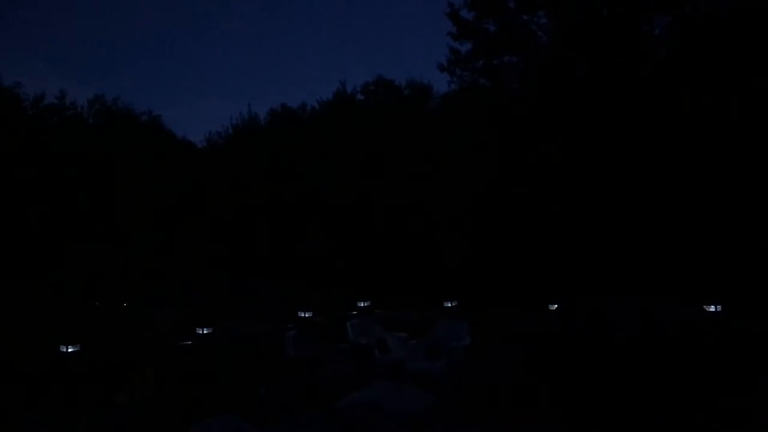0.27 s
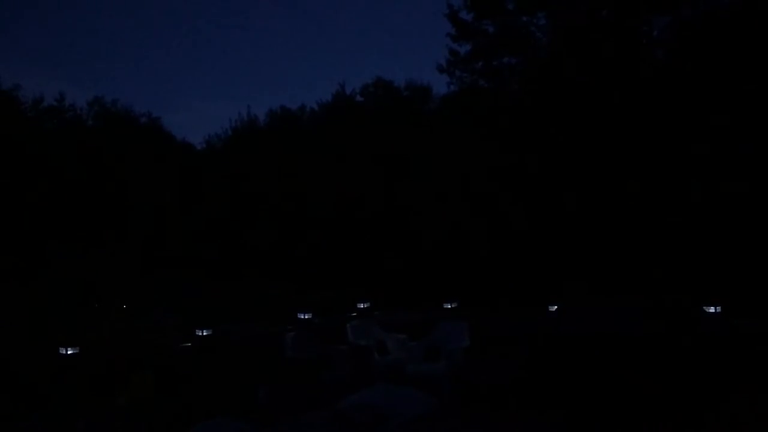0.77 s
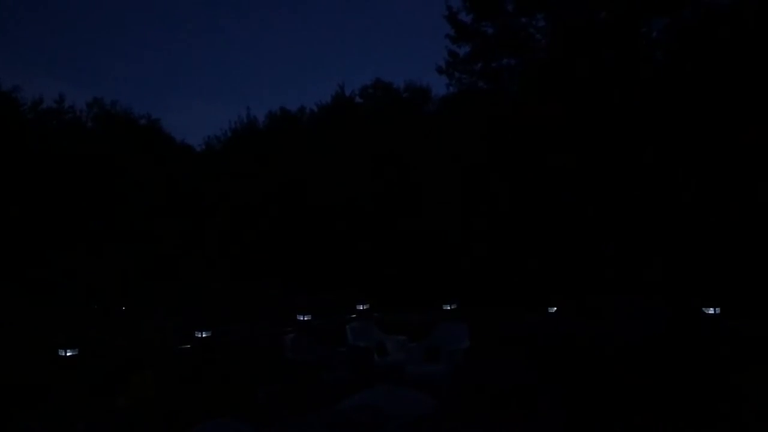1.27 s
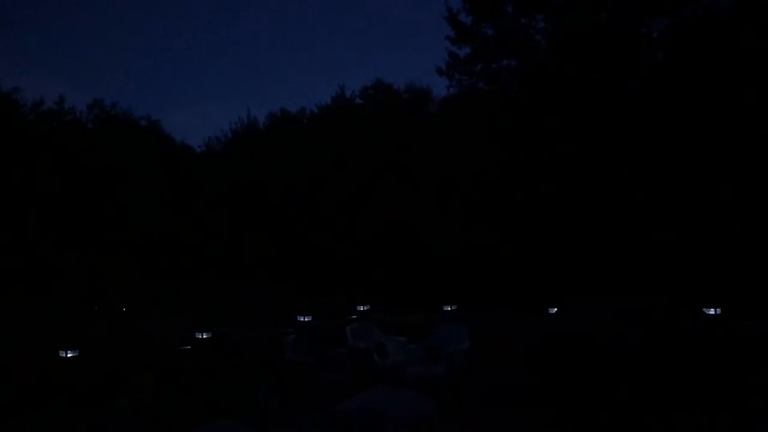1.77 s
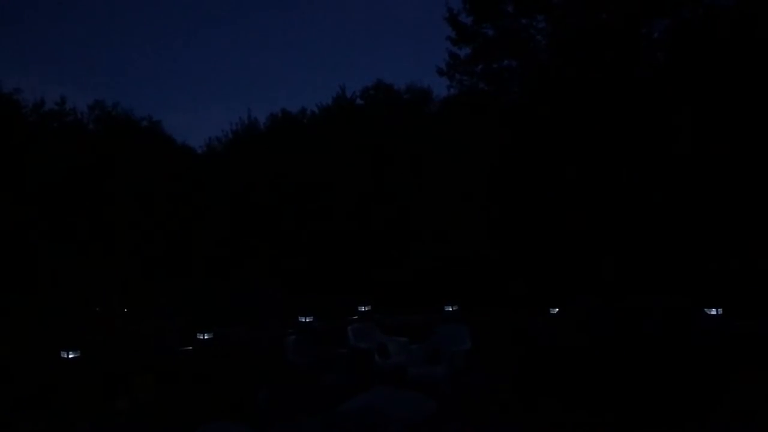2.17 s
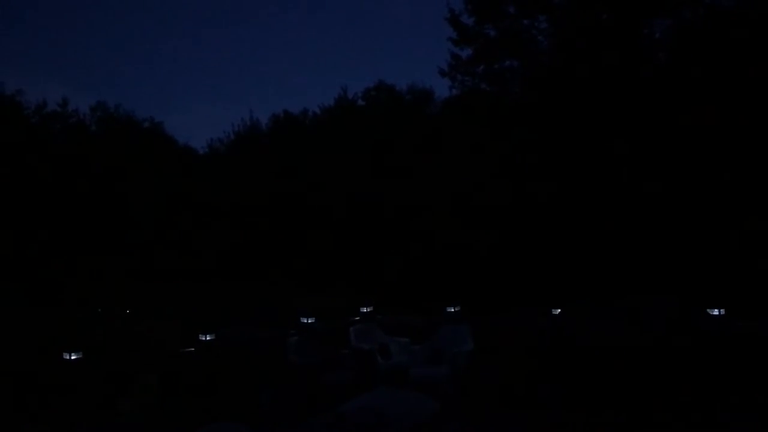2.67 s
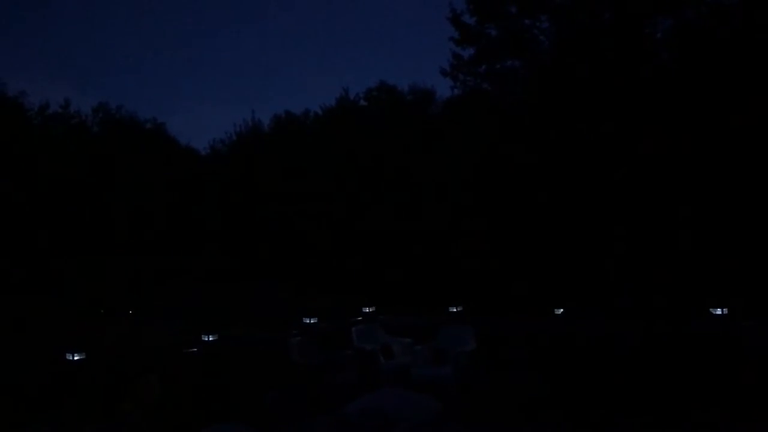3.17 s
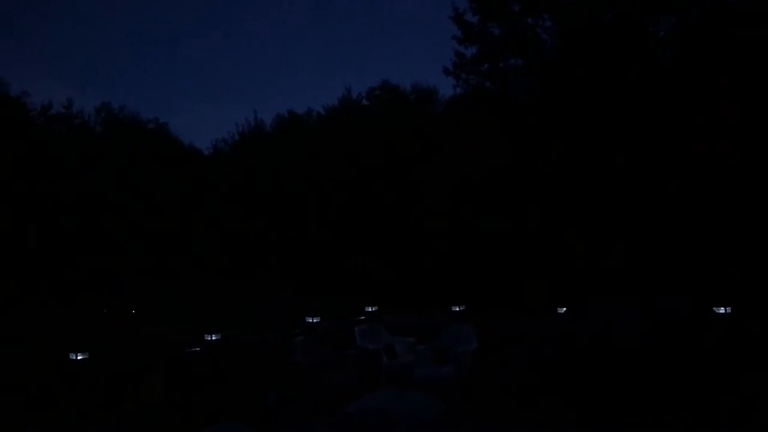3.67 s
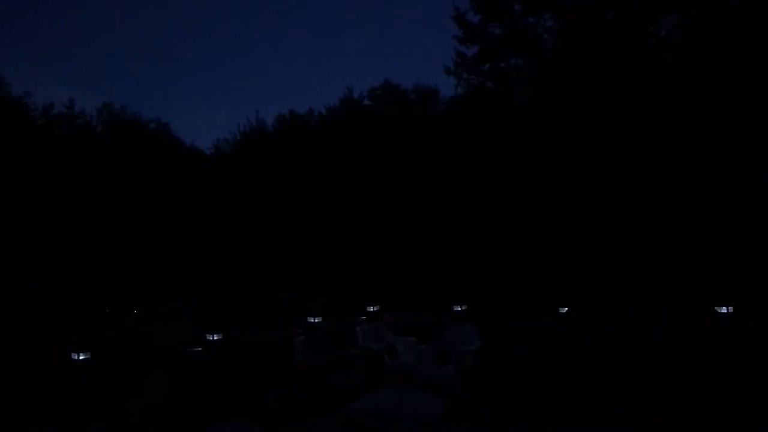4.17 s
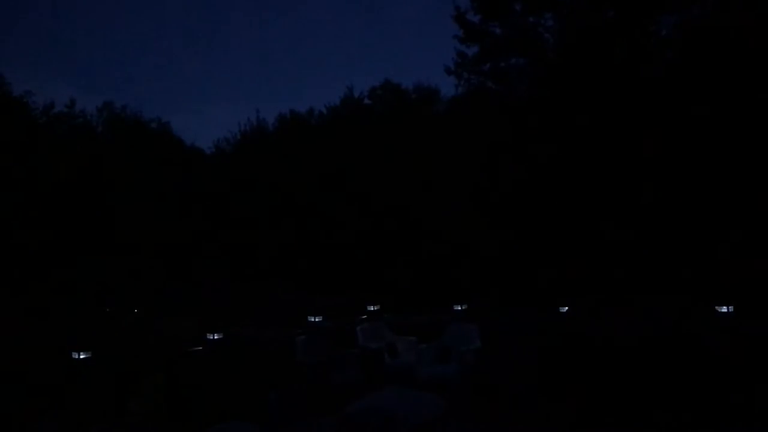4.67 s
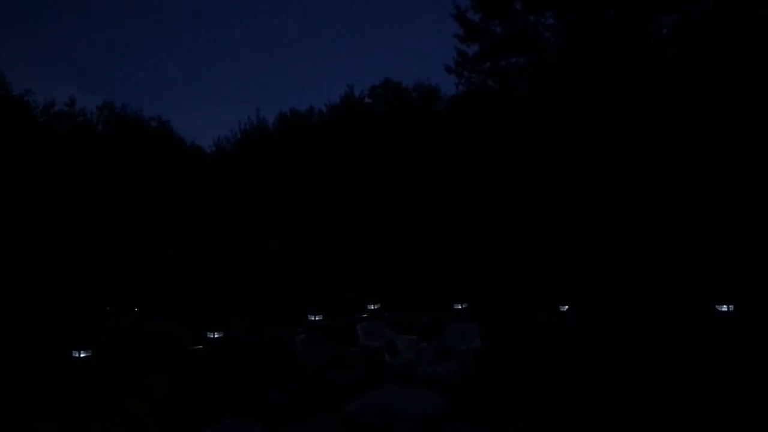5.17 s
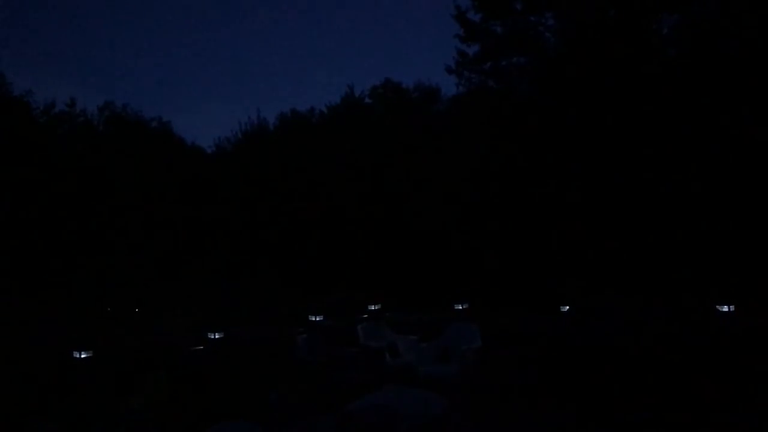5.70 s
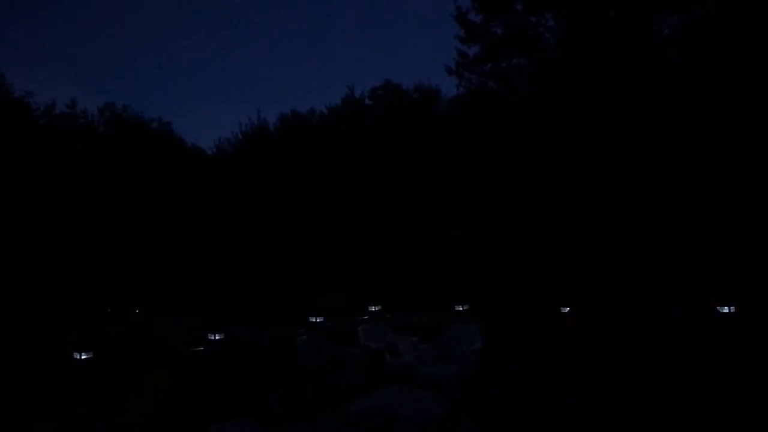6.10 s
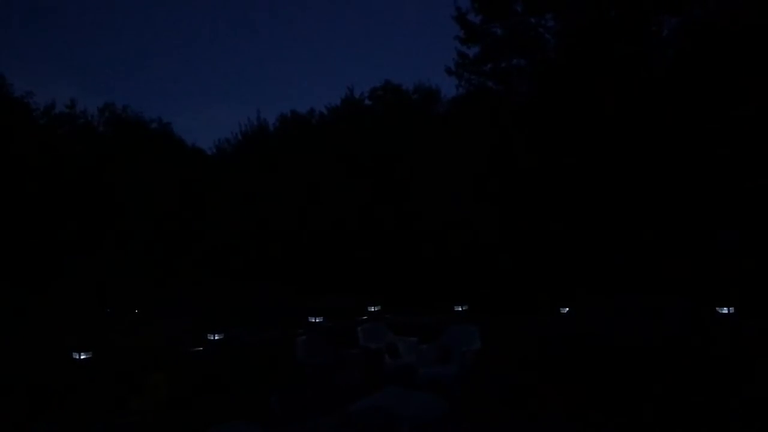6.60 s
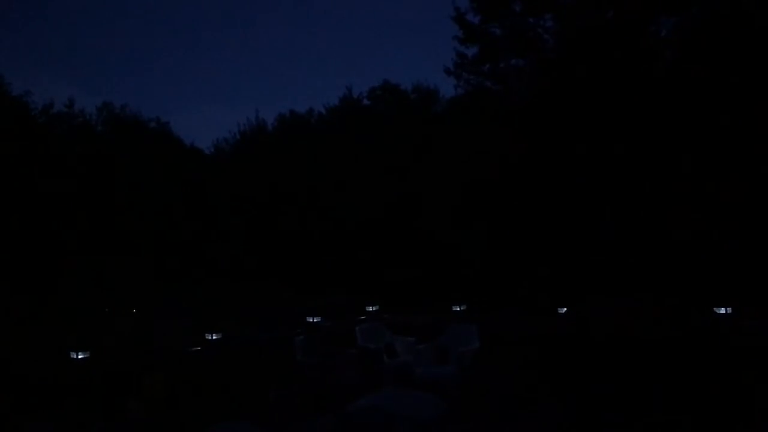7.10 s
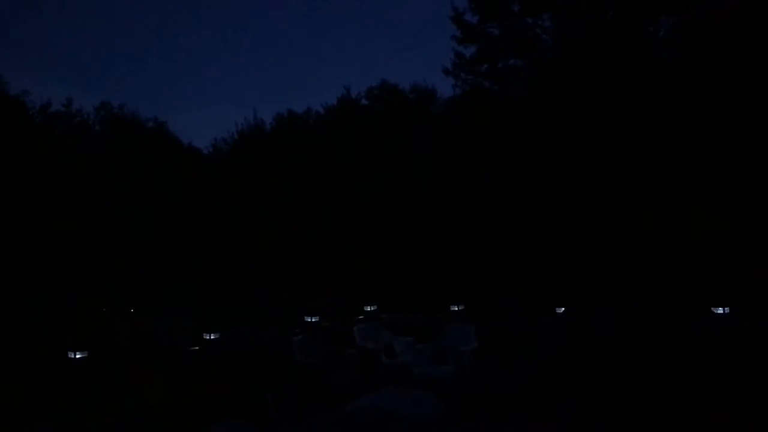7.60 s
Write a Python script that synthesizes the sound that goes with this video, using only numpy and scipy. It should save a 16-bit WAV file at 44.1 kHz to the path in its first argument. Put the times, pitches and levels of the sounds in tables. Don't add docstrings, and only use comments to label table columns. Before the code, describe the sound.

A pond garden at nightfall, caught by one phone microphone. Four tree frogs take turns giving quick rattling trills of eleven to fifteen rising pulses, each about half a second long. The nearest frog is loudest and driest; the others sound more echoed. A near cricket chirps steadily in four-stroke bursts, with a higher answering one and more far off. Soft air, distant road and a faint pump hum lie underneath.

```python
import sys
import numpy as np
from scipy import signal
from scipy.fft import rfft, irfft
from scipy.io import wavfile
from scipy.ndimage import uniform_filter1d

SR = 44100
rng = np.random.default_rng(int(sys.argv[2]) if len(sys.argv) > 2 else 0)


def transcribe(u):
    v = np.clip(np.atleast_2d(u).T, -1, 1)
    q = np.round(v * 32767).astype(np.int16)
    wavfile.write(sys.argv[1], SR, q)


def natural_amplitude(level_db):
    exponent = np.asarray(level_db, float) / 20
    return 10 ** exponent


N = 346185
LEAD = SR

# t/s after the first, length/s, level/dB
DISTANT_STROKES = [
    (0, 0.02, 2),
    (.037, .018, -1.5),
    (.076, .02, 5.5),
    (.118, .02, 1),
]


def level(x, db):
    return x * natural_amplitude(db) / np.sqrt(np.mean(x ** 2))


def add(track, sound, s):
    i = int(s * SR) + LEAD
    piece = track[i:i + len(sound)]
    piece += sound[:len(piece)]


def walk(rate):
    k = int(SR / rate)
    held = np.repeat(rng.standard_normal(N // k + 1), k)[:N]
    return 1.316 * uniform_filter1d(uniform_filter1d(held, k), k)


def air():
    # f/Hz, level/dB per Hz
    colour = [(18, -72), (28, -30.5), (50, -17.5), (85, -12.5), (190, -8), (300, -14.5), (520, -21.5),
              (1300, -23.5), (2050, -27.5), (2500, -28), (4300, -26.5), (5400, -29.5), (10000, -40),
              (15500, -46.5)]
    hz = np.maximum(np.arange(N // 2 + 1) * SR / N, 1)
    f, db = np.transpose(colour)
    gain = natural_amplitude(np.interp(np.log(hz), np.log(f), db))
    noise = irfft(rfft(rng.standard_normal(N)) * gain, N)
    return level(noise, -62.3) * natural_amplitude(1.2 * walk(1.2))


def pump():
    # f/Hz, wander/Hz, rms level/dB
    tones = [
        (54.6, 5.3, -71.5),
        (115.6, 4.84, -66.5),
        (186.2, 9.87, -76),
        (232.3, 4.26, -72.5),
    ]
    out = 0
    for hz, wander_hz, db in tones:
        phase = 2 * np.pi * np.cumsum(hz + wander_hz / 2 * walk(6)) / SR
        out = out + level(np.sin(phase) * natural_amplitude(2.14 * walk(5)), db)
    return out


def garden(sound, near_db, near_t60, lift_db, tail_db, tail_t60, band_hz=(1700, 2700)):
    t = np.arange(3 * SR // 2) / SR
    near, tail = rng.standard_normal((2, len(t)))
    near *= rng.random(len(t)) ** 6 * natural_amplitude(-60 * t / near_t60)
    near *= natural_amplitude(near_db) / np.linalg.norm(near)
    treble = signal.lfilter(*signal.butter(2, 4000, "high", fs=SR), near)
    near += (natural_amplitude(lift_db) - 1) * treble
    tail = signal.lfilter(*signal.butter(1, band_hz, "band", fs=SR), tail)
    tail *= natural_amplitude(-60 * t / tail_t60) * (1 - np.exp(-(t / .17) ** 2))
    reply = near + natural_amplitude(tail_db) * tail / np.linalg.norm(tail) / 3
    reply[0] = 1
    return signal.fftconvolve(sound, reply)[LEAD:LEAD + N]


def wing_stroke(length, wing):
    share, hz, wing_db = np.transpose(wing)
    u = np.arange(0, length, 1 / SR) / length
    rough = 9 * uniform_filter1d(rng.standard_normal(len(u)), 80)
    pitch = np.interp(u, share, hz) * (1 + .003 * rng.standard_normal() + .007 * rough)
    phase = 2 * np.pi * np.cumsum(pitch) / SR
    tone = np.sin(phase) + natural_amplitude(-29) * np.sin(2 * phase) + natural_amplitude(-32) * np.sin(3 * phase)
    return natural_amplitude(np.interp(u, share, wing_db)) * np.clip(8 * np.minimum(u, 1 - u), 0, 1) * tone


def cricket(chirps, strokes, wing, gain_db, scatter_db=1.0):
    track = np.zeros(LEAD + N)
    for at, db in chirps:
        for after, length, stroke_db in strokes:
            loud_chance, time_chance = rng.standard_normal(2)
            loud = natural_amplitude(db + stroke_db + gain_db + scatter_db * loud_chance)
            start = at + after - .6 * length + 0.00092 * time_chance
            add(track, loud * wing_stroke(length, wing), start)
    return garden(track, near_db=1, near_t60=0.14, lift_db=0, tail_db=-5, tail_t60=1, band_hz=(3500, 6000))


def near_cricket():
    # t/s, level/dB
    chirps = [(0.017, -54.5), (0.308, -55.5), (0.625, -56.7), (0.931, -55.8), (1.317, -55), (1.634, -56),
              (1.931, -55.6), (2.214, -55.1), (2.521, -55.5), (2.829, -55.5), (3.166, -55.5),
              (3.488, -54.2), (3.866, -54.5), (4.168, -55.5), (4.482, -55), (4.793, -55), (5.109, -54.1),
              (5.402, -56), (5.693, -55.5), (5.994, -55), (6.296, -54), (6.641, -54.5), (6.96, -55),
              (7.294, -53.9)]
    # t/s after the first, length/s, level/dB
    strokes = [
        (0, .022, 0),
        (0.037, 0.034, 1),
        (0.082, 0.039, 1.5),
        (0.13, 0.05, 0.5),
    ]
    # share of the stroke, f/Hz, level/dB
    wing = [(0, 4674, -15.5), (.33, 4654, -7), (0.439, 4484, -7.5), (.65, 4537, -9), (.83, 4480, -2.5),
            (.9, 4100, -12), (1.001, 4220, -15)]
    return cricket(chirps, strokes, wing, 5.3)


def answering_cricket():
    # t/s, level/dB
    chirps = [(0.033, -65), (0.382, -64), (0.696, -69), (0.994, -68), (1.317, -64.6), (1.647, -65.7),
              (1.985, -65.8), (2.283, -70), (2.605, -74), (2.906, -74), (3.238, -64), (3.539, -64.4),
              (3.857, -67), (4.17, -64), (4.469, -64.1), (4.819, -64.3), (5.129, -68), (5.433, -67.0),
              (5.729, -67), (6.054, -68), (6.376, -68), (6.67, -70), (6.947, -65), (7.247, -64.2),
              (7.579, -65.8)]
    # share of the stroke, f/Hz, level/dB
    wing = [(0, 4960, -8), (.5, 4880, 0), (1, 4700, -7)]
    return cricket(chirps, DISTANT_STROKES, wing, 0.8)


def far_crickets(db, count=2):
    # share of the stroke, f/Hz, level/dB
    far_wing = [(0, 4740, -10), (.5, 4635, -0.5), (1, 4450, -21.5)]
    out = 0
    for pace, start, tune, off_db in rng.random((count, 4)):
        times = np.arange(-.5 + .3 * start, N / SR, .27 + .1 * pace)
        chirps = [(s, db - 6 * off_db) for s in times]
        wing = [(u, f * (.95 + 0.0926 * tune), d) for u, f, d in far_wing]
        out = out + cricket(chirps, DISTANT_STROKES, wing, 0, scatter_db=0.0)
    return out


def trill(calls, first_gap, slowing, longest, start_db, swell):
    out = []
    for start, pulses, db in calls:
        k = np.arange(round(pulses))
        last = k == k[-1]
        gaps = np.minimum(first_gap + slowing * (k - 1), longest) * (k > 0)
        at = start + np.cumsum(gaps) + .002 * last
        scatter_db = .8 * rng.standard_normal(len(k))
        pulse_db = db + start_db * np.exp(-k / swell) - 2 * last + scatter_db
        out.append(list(zip(at, pulse_db)))
    return out


def sac(hz, modes):
    return sum(natural_amplitude(db) / (1 + (2 * (hz - f) / w) ** 2) ** 2 for f, w, db in modes)


def pulse(empty, glide, modes, slack_db, hurry, rise, fall, sag_db):
    throb_hz, throb_db = 240, -7
    focus_db, focus_at = 6, .45
    overtone = np.arange(1, 15)[:, None]
    s, hz = np.transpose(glide)
    when = s * (1 - hurry * empty)
    t = np.arange(when[0], when[-1], 1 / SR)
    part = (t - when[0]) / (when[-1] - when[0]) / (1 - 0.37 * empty ** 2)
    shape = np.clip(np.minimum(part / rise, (1 - part) / fall), 0, 1) ** 1.75
    shape = shape * natural_amplitude(-sag_db * empty * part)

    pitch_chance, phase_chance = rng.standard_normal(2)
    pitch = uniform_filter1d(np.interp(t, when, hz), 160, mode="nearest")
    pitch = pitch * (1 + 0.0057 * pitch_chance - .03 * empty)
    wander = 0.0069 * uniform_filter1d(np.cumsum(rng.standard_normal(len(t))), 40)
    phase = 2 * np.pi * np.cumsum(pitch) / SR + phase_chance + wander
    throb = 2 * np.pi * throb_hz * t
    voice = sac(overtone * pitch, modes) * np.sin(overtone * phase)
    for side in (-1, 1):
        gain = natural_amplitude(throb_db) * part ** 2 * sac(overtone * pitch + side * throb_hz, modes)
        voice += gain * np.sin(overtone * phase + side * throb)

    octaves = np.log2(overtone / 2)
    colour = natural_amplitude(-slack_db * empty * octaves)
    colour = colour * natural_amplitude(-focus_db * np.maximum(octaves, 0) * (2 * (part - focus_at)) ** 2)
    return when[0], shape * (colour * voice).sum(0)


def late_copy(sound, delay, db, hz, width):
    band = signal.iirpeak(hz, hz / (2.16 * width), fs=SR)
    ringing = signal.lfilter(*band, signal.lfilter(*band, sound))
    return natural_amplitude(db) * np.roll(ringing, int(delay * SR))


def frog(calls, glide, modes, echoes, path, gain_db, slack_db, hurry, rise=0.19, fall=0.19, sag_db=9):
    track = np.zeros(LEAD + N)
    for call in calls:
        for k, (at, db) in enumerate(call):
            empty = np.exp(-k / 1.5)
            start, sound = pulse(empty, glide, modes, slack_db, hurry, rise, fall, sag_db)
            add(track, natural_amplitude(db + gain_db + sag_db * empty / 2) * sound, at + start)
    thrown = sum(late_copy(track, *echo) for echo in echoes)
    return garden(track + thrown, **path)


def left_frog():
    # first pulse t/s, pulses, full level/dB
    calls = [
        (0.503, 12, -33),
    ]
    # t/s from the pulse mark, f/Hz
    glide = [(-.008, 800), (0, 924), (.008, 1030), (0.015, 1090), (.024, 1200)]
    # f/Hz, width/Hz, level/dB
    modes = [(908, 220, -15), (1113, 170, -4), (1340, 200, -8), (1780, 220, -1.5), (1995, 320, 1.5),
             (2300, 225, -2), (2650, 300, -28), (3150, 220, -14), (3720, 170, -19), (6300, 340, -39),
             (7150, 1200, -32)]
    # delay t/s, level/dB, f/Hz, width/Hz
    echoes = [(.012, -9, 1960, 600), (.020, -10, 1250, 500), (.082, -11, 2127, 300)]
    path = dict(near_db=-2.5, near_t60=0.27, lift_db=7.5, tail_db=-13.5, tail_t60=0.95)
    pulses = trill(calls, first_gap=.0386, slowing=.00045, longest=.046, start_db=-18, swell=.7)
    return frog(pulses, glide, modes, echoes, path, gain_db=-4.0, slack_db=14.5, hurry=.35, sag_db=15)


def near_frog():
    # first pulse t/s, pulses, full level/dB
    calls = [
        (1.436, 12, -29),
        (4.044, 11, -29.3),
        (6.655, 11, -28.5),
    ]
    # t/s from the pulse mark, f/Hz
    glide = [(-.011, 800), (-.001, 915), (.005, 1005), (.012, 1055), (.022, 1130)]
    # f/Hz, width/Hz, level/dB
    modes = [(850, 240, -15.5), (1075, 190, -2.5), (1330, 240, -9), (1820, 170, 2.5), (2030, 320, 2),
             (2246, 130, 5), (2650, 300, -27), (3100, 400, -14.5), (3670, 450, -21), (6140, 380, -22),
             (6640, 700, -22), (8000, 900, -43), (9700, 600, -41), (11900, 900, -37)]
    # delay t/s, level/dB, f/Hz, width/Hz
    echoes = [(.009, -5.5, 2045, 530), (.017, -8, 1830, 280), (.020, -6.5, 2246, 200),
              (.026, -17, 950, 300)]
    path = dict(near_db=-9, near_t60=.27, lift_db=9.5, tail_db=-18.5, tail_t60=1.15)
    pulses = trill(calls, first_gap=.0394, slowing=.00087, longest=.048, start_db=-19, swell=.9)
    return frog(pulses, glide, modes, echoes, path, gain_db=-2.66, slack_db=13, hurry=.4, rise=.22, sag_db=19)


def bank_frog():
    # first pulse t/s, pulses, full level/dB
    calls = [
        (2.592, 15, -31.5),
        (5.390, 13, -31.5),
        (-0.960, 13, -35),
    ]
    # t/s from the pulse mark, f/Hz
    glide = [(-.006, 830), (.003, 980), (.011, 1050), (.019, 1105), (.030, 1270)]
    # f/Hz, width/Hz, level/dB
    modes = [(1030, 200, -12.5), (1250, 260, -4.5), (1820, 280, -2), (2130, 300, 2), (2370, 200, 2),
             (2850, 600, -22.5), (3173, 140, -12), (7450, 480, -34), (11510, 400, -48), (14800, 500, -66)]
    # delay t/s, level/dB, f/Hz, width/Hz
    echoes = [(.017, -6.5, 2160, 219), (.020, -9, 1080, 196), (.058, -15.5, 2100, 300)]
    path = dict(near_db=-6, near_t60=0.2, lift_db=8, tail_db=-15, tail_t60=1.1)
    pulses = trill(calls, first_gap=.0379, slowing=.0008, longest=.0434, start_db=-19, swell=.75)
    return frog(pulses, glide, modes, echoes, path, gain_db=-2.4, slack_db=9, hurry=0.17, fall=.28, sag_db=23)


def small_frog():
    # first pulse t/s, pulses, full level/dB
    calls = [
        (3.938, 15, -37),
    ]
    # t/s from the pulse mark, f/Hz
    glide = [(-.005, 927), (0, 1050), (.008, 1170), (0.015, 1237), (.022, 1320)]
    # f/Hz, width/Hz, level/dB
    modes = [(1170, 370, -6), (2154, 420, 2.5), (2537, 750, -4.5), (3380, 900, -13.5), (3440, 250, -24.5),
             (7300, 1200, -18), (7900, 210, -24), (14800, 1400, -36)]
    # delay t/s, level/dB, f/Hz, width/Hz
    echoes = [(.012, -6, 2300, 810), (.025, -8, 1240, 400)]
    path = dict(near_db=-4, near_t60=0.27, lift_db=6, tail_db=-13, tail_t60=1.1)
    pulses = trill(calls, first_gap=.0332, slowing=.001, longest=.040, start_db=-26, swell=.55)
    return frog(pulses, glide, modes, echoes, path, gain_db=-3, slack_db=12, hurry=.2)


def scene():
    insects = near_cricket() + answering_cricket() + far_crickets(-67.5)
    frogs = left_frog() + near_frog() + bank_frog() + small_frog()
    return (air() + pump() + insects + frogs)[None]


def band_limit(x):
    return signal.sosfilt(signal.butter(12, 15620, fs=SR, output="sos"), x)


def record(dry):
    return band_limit(dry)


dry = scene()
out = record(dry)
transcribe(out)
```